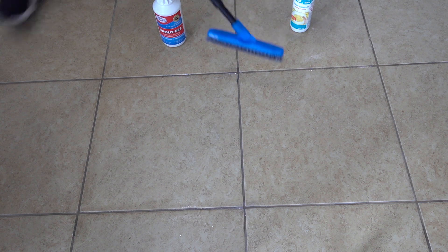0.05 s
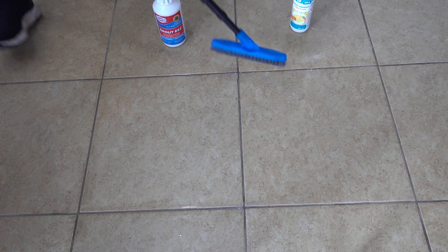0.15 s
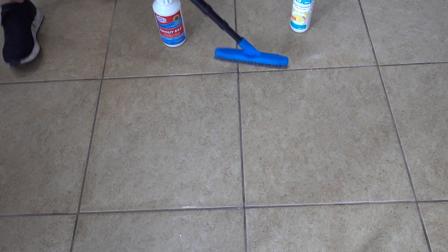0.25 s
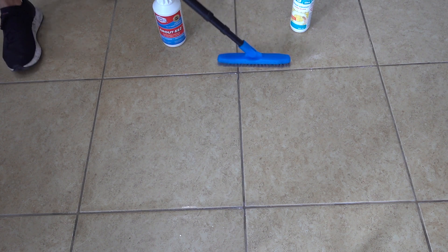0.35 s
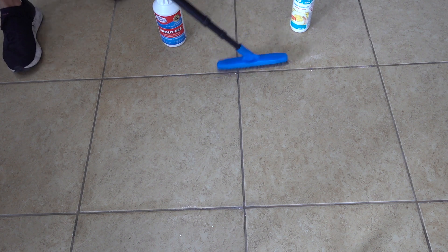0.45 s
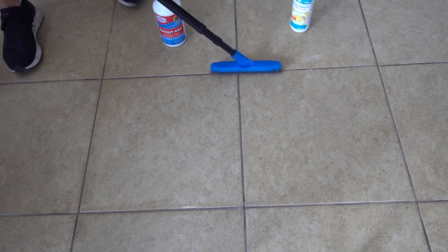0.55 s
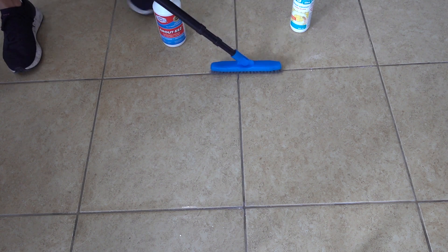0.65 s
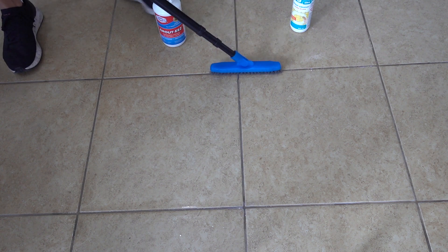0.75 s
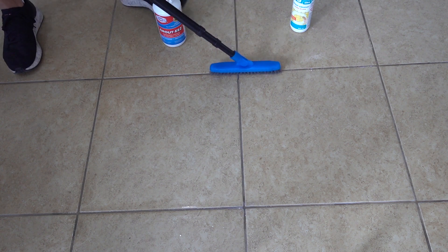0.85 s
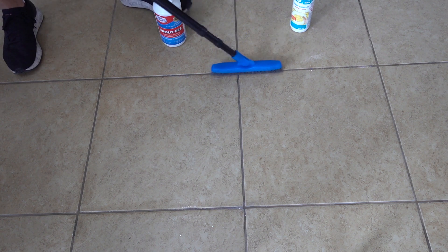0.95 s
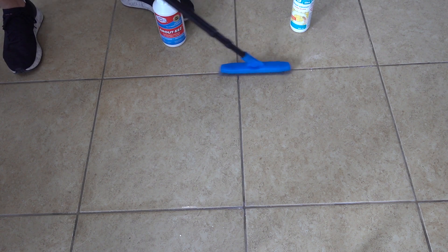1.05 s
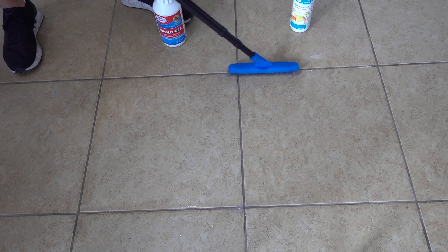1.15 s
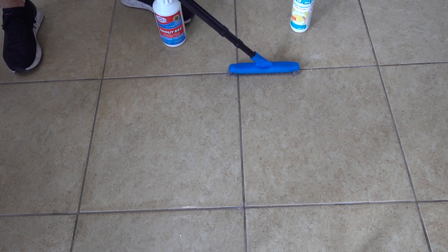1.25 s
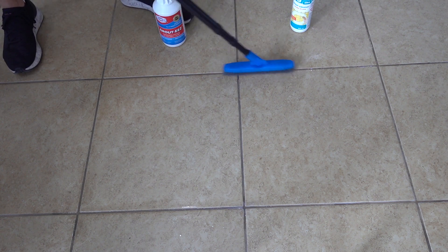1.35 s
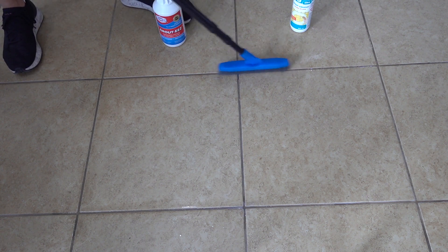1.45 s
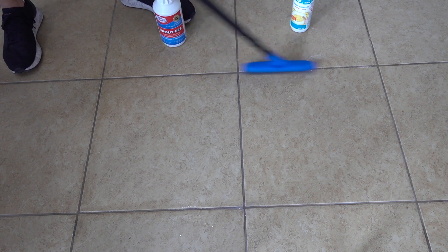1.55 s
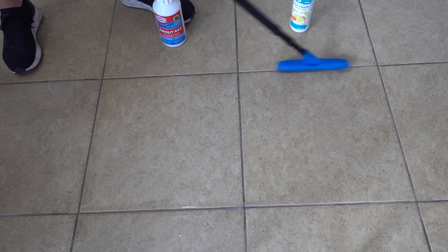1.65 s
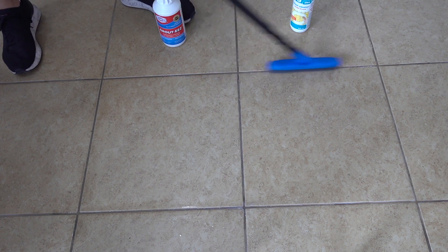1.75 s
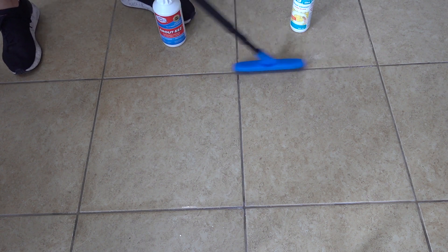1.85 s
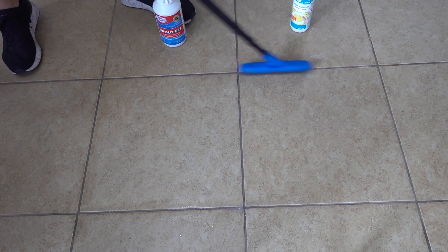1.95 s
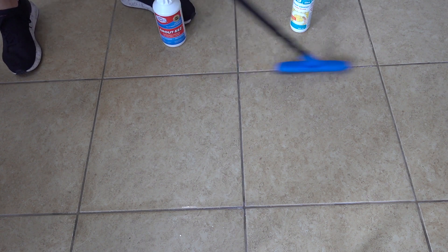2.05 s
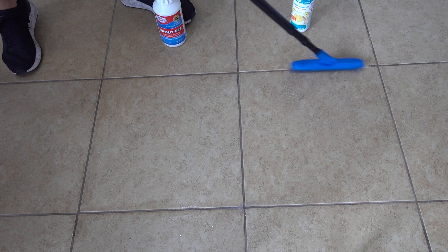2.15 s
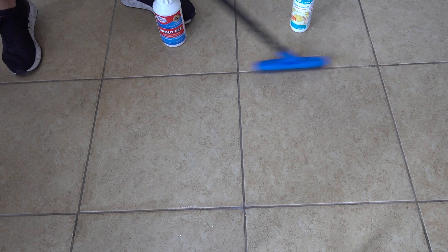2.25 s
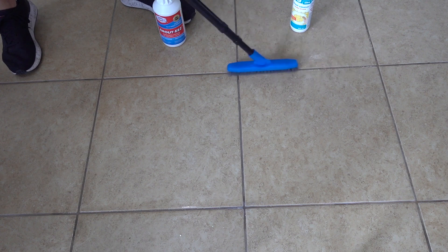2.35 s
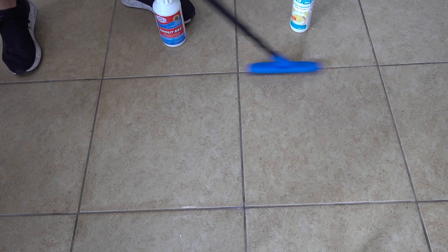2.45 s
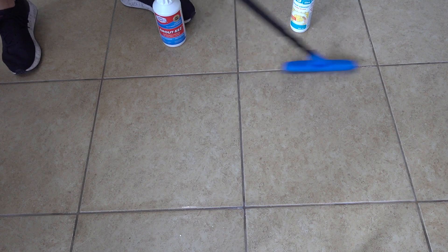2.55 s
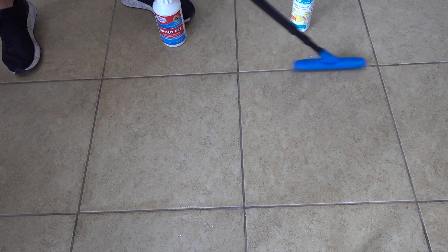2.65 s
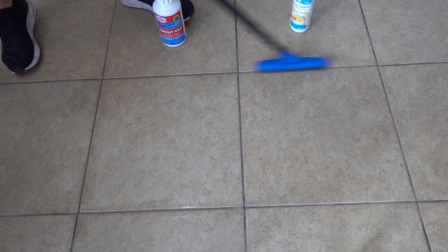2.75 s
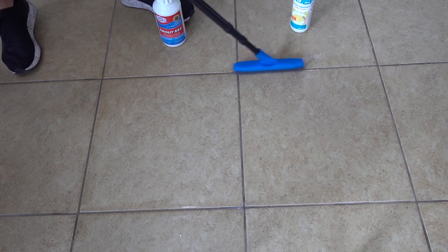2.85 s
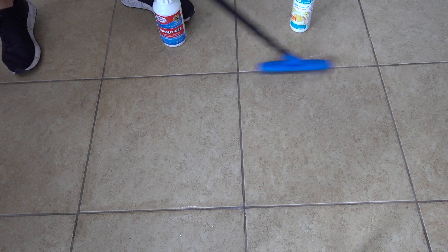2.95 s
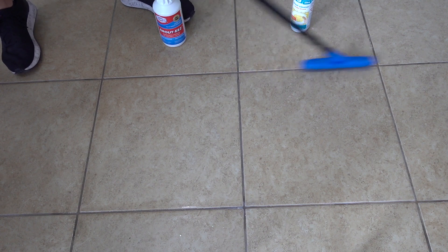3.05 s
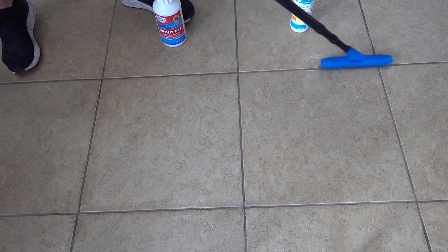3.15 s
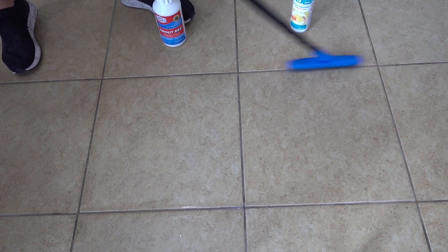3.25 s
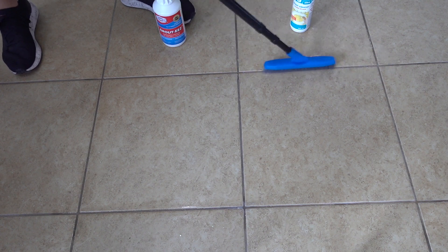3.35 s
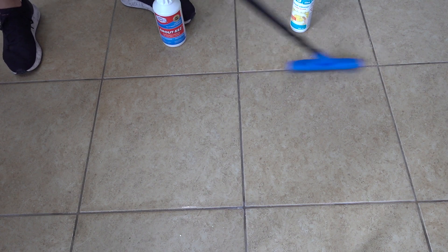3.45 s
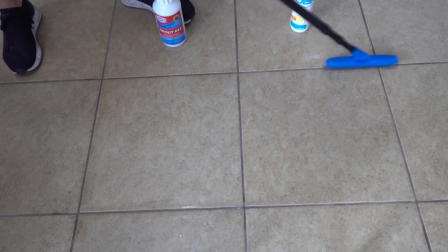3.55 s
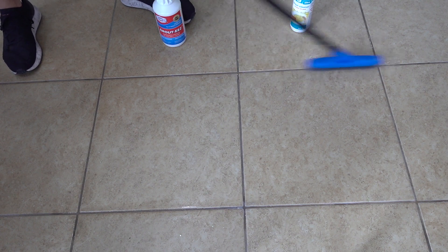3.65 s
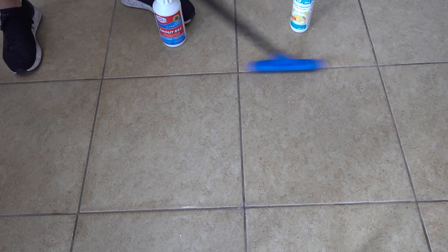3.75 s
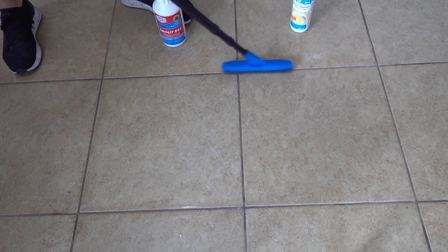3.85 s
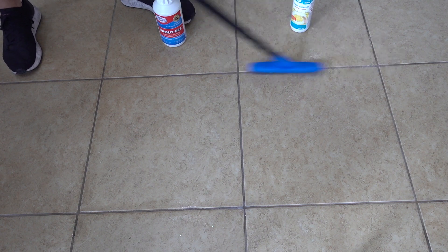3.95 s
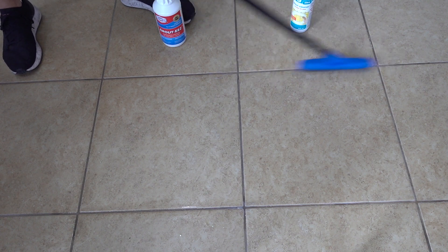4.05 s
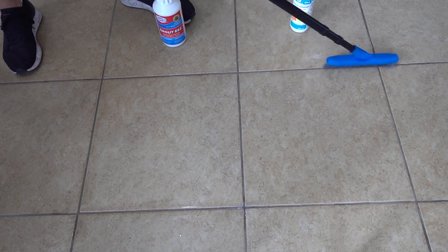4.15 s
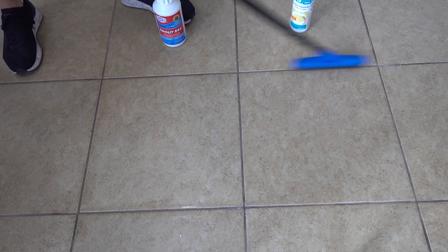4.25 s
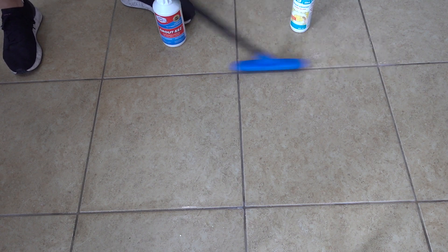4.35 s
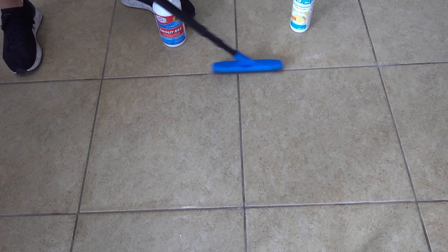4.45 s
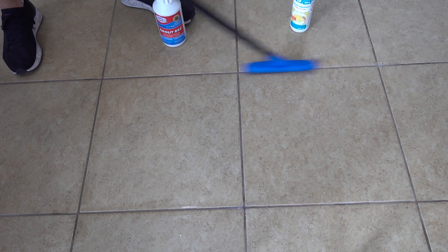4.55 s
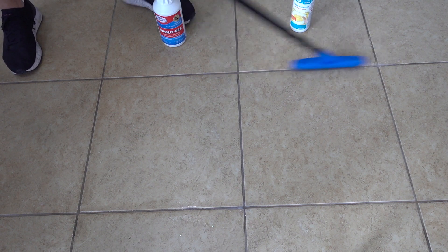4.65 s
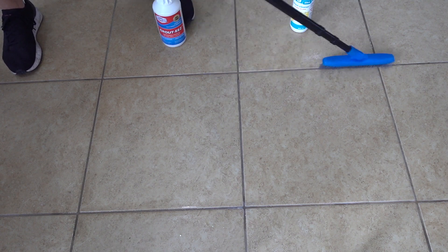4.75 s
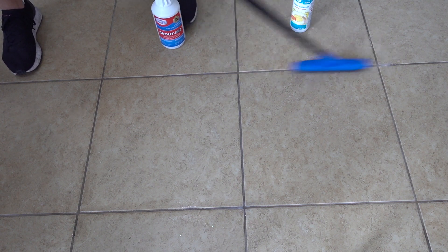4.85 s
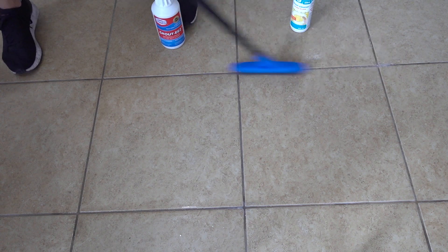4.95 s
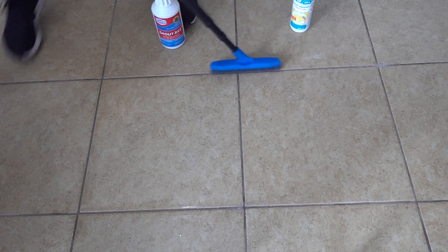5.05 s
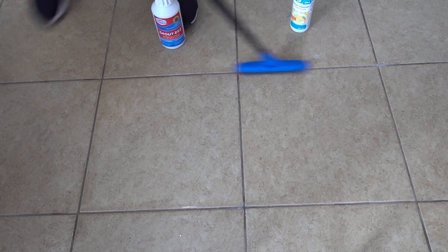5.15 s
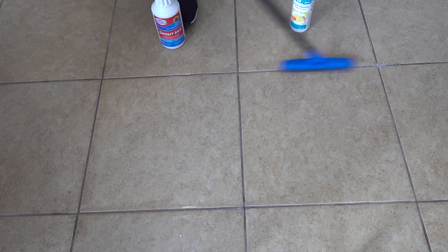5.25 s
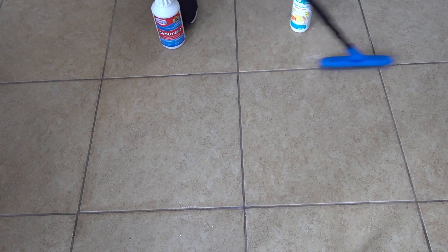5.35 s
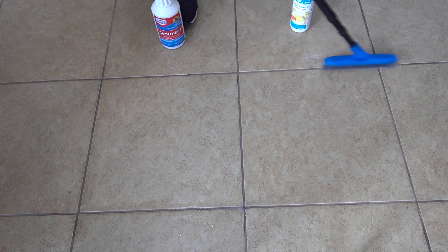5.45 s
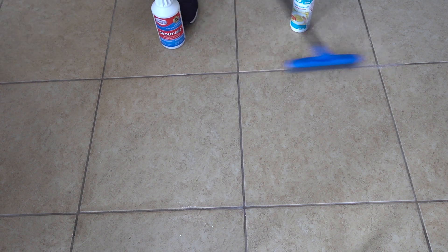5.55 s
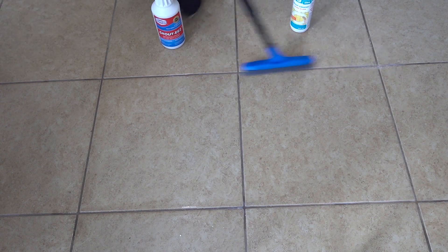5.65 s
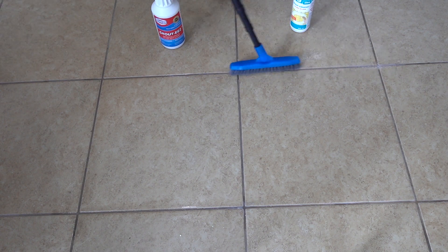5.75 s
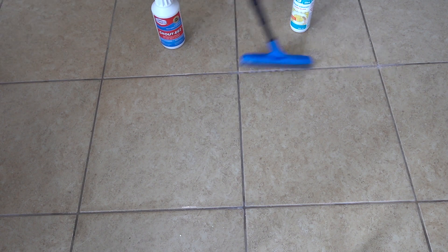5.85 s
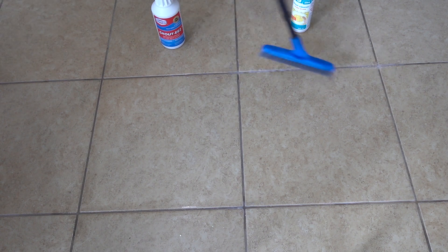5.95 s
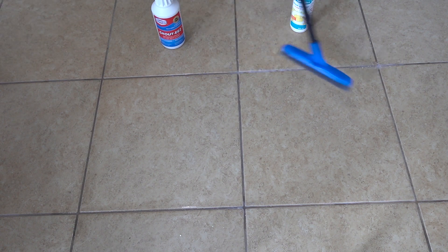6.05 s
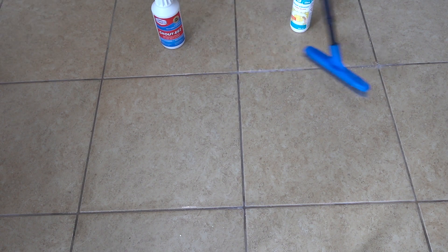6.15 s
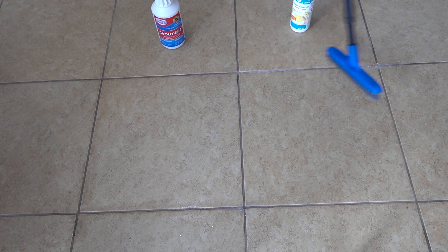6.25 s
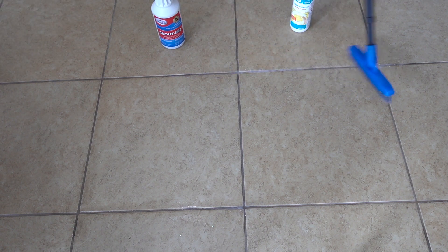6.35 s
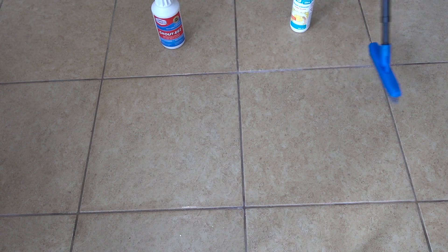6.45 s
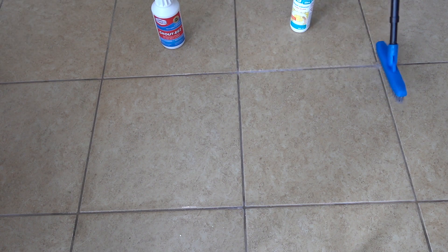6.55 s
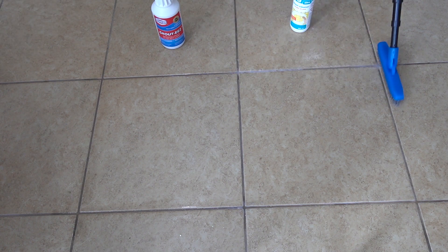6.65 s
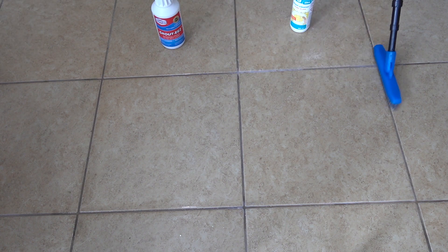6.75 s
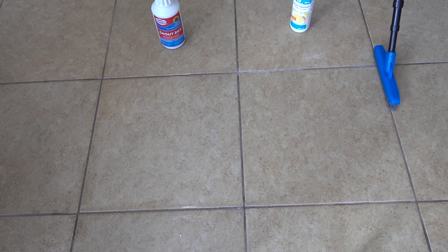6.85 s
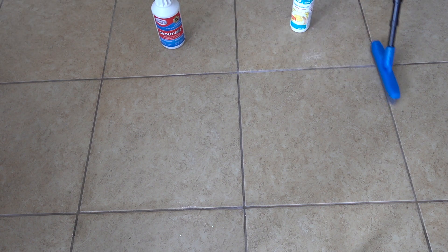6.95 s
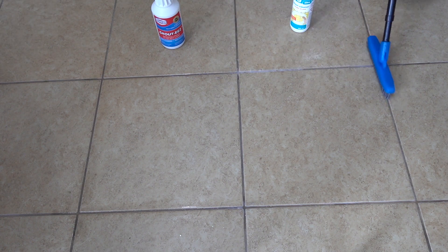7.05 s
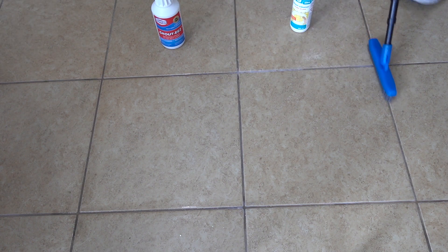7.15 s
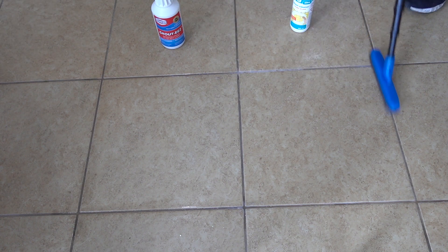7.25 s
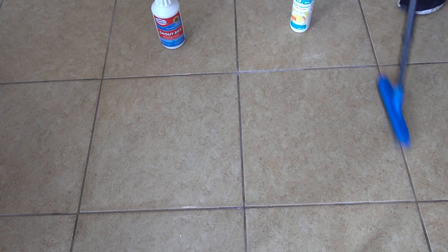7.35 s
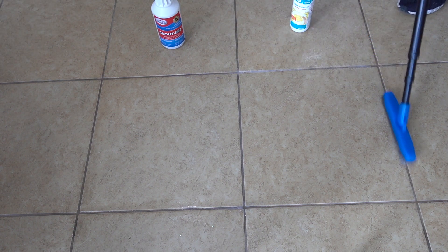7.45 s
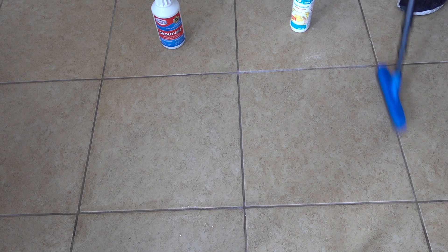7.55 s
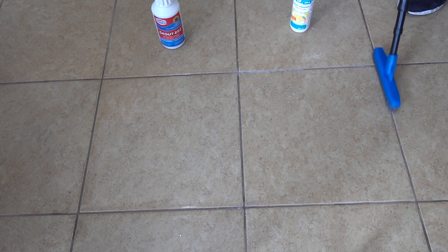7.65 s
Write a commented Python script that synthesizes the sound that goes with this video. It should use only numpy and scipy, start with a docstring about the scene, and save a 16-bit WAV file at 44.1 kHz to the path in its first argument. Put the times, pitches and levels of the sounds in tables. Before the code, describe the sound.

Indoors over quiet room air and a faint low hum, a plastic brush head taps down on tile. Stiff bristles then scrub to and fro about four strokes a second, bright, hissy and gritty. Scrubbing stops, shoes shift softly, the head is turned with small knocks and one sharp clack, then two strong strokes follow. Close microphone, short hard-room echo.

```python
"""Room air and a faint hum come first, then a few plastic knocks, then a stiff brush scrubs tile grout
to and fro at about four strokes a second. In each stroke noise flicks of the bristle tips hiss; a moment
later the bristles bend under the load and rasp lower down, through a sliding resonance. Ringing modes and
noise cracks make the head knock as it is set down and turned; band noise makes the snaps, chatter and
shifting shoes. A decaying noise tail is the hard room's answer."""
import sys
import numpy as np
from scipy import signal
from scipy.fft import rfft, irfft, next_fast_len
from scipy.io import wavfile
from scipy.ndimage import map_coordinates

SR = 44100
rng = np.random.default_rng(int(sys.argv[2]) if len(sys.argv) > 2 else 0)


def transcribe(u):
    """Save the signal u as a 16-bit wav file named by the first command-line argument.

    u: samples, shape (n,) or (channels, n), limited to [-1, 1]; the rate is SR.
    q: integer samples, one column per channel.
    """
    v = np.clip(np.atleast_2d(u).T, -1, 1)
    q = np.round(v * 32767).astype(np.int16)
    wavfile.write(sys.argv[1], SR, q)


N = 340452


def amp(db):
    """Amplitude from dB."""
    return 10 ** (np.asarray(db) / 20)


def unit(x):
    """x at rms 1."""
    return x / np.sqrt(np.mean(x ** 2) + 1e-20)


def along(points, hz):
    """(Hz, value) points read on a log frequency axis."""
    f, v = np.transpose(points)
    return np.interp(np.log(hz + 1), np.log(f + 1), v)


def curves(rows):
    """One value per sample for each column after the time."""
    time_s, *cols = np.transpose(rows)
    return [np.interp(np.arange(N) / SR, time_s, c) for c in cols]


def wobble(rate_hz):
    """A smooth random curve with rate_hz knots a second."""
    knots = rng.standard_normal(int(N * rate_hz / SR) + 4)
    return map_coordinates(knots, [np.arange(N) * rate_hz / SR])


def filtered(x, response):
    """x times a response of frequency."""
    m = next_fast_len(len(x) + 8192)
    hz = np.fft.rfftfreq(m, 1 / SR)
    return irfft(rfft(x, m) * response(hz), m)[:len(x)]


def coloured(x, spectrum):
    """x shaped by a (Hz, dB) spectrum, at rms 1."""
    return unit(filtered(x, lambda hz: amp(along(spectrum, hz))))


def band_noise(size, centre_hz, q):
    """Noise of rms 1 through the same resonance twice."""
    def resonance(f):
        return 1j * f / (centre_hz ** 2 - f * f + 1j * f * centre_hz / q)

    return unit(filtered(rng.standard_normal(size), lambda f: resonance(f) ** 2))


def add(track, start_s, sound):
    """Mix a sound into the track at start_s."""
    part = track[round(start_s * SR):][:len(sound)]
    part += sound[:len(part)]


def scuffs(table, q):
    """Short rubs that swell and fade unevenly, each around its own pitch."""
    out, t = np.zeros(N), np.arange(SR // 2) / SR
    for start_s, db, rise_s, hz in table:
        u = t / rise_s
        envelope = (u * np.exp(1 - u)) ** 2  # peaks at rise_s
        add(out, start_s, amp(db) * envelope * band_noise(len(t), hz, q))
    return out * amp(2.5 * wobble(60))


# room air spectrum: (frequency [Hz], relative level [dB])
AIR_SPECTRUM = [(20, -10), (55, -0.5), (95, -7), (135, -10), (275, -12), (400, -11), (620, -15.5),
                (1270, -22), (4770, -27.5), (9850, -29.5), (10200, -45.5), (15700, -40)]
# hum partials: (frequency [Hz], mean rms level [dB])
HUM_PARTIALS = [(58, -65), (132, -65.5), (229, -71)]


def background():
    """Shaped noise for room air; sines drifting in level and phase for an appliance hum."""
    t = np.arange(N) / SR
    hum = np.zeros(N)
    for hz, db in HUM_PARTIALS:
        level = np.sqrt(2) * amp(db + 1.1 * wobble(2.7))
        hum += level * np.sin(2 * np.pi * hz * t + .4 * wobble(5.2))
    return hum + amp(-52) * coloured(rng.standard_normal(N), AIR_SPECTRUM)


# decay of the hard room: (frequency [Hz], t60 [s])
ROOM_DECAY = [(150, 0.28), (400, 0.35), (1000, 0.59), (2800, 0.64), (8000, 0.59)]


def room(x, wet_db):
    """A sound with the hard room's answer, each frequency dying at its own speed."""
    hz, t, z = signal.stft(rng.standard_normal(SR * 3 // 4), SR, nperseg=256)
    decay = amp(-60 * t / along(ROOM_DECAY, hz)[:, None])
    tail = signal.istft(z * decay, SR, nperseg=256)[1]
    tail = np.pad(tail / np.linalg.norm(tail), (SR // 128, 0))  # delay before the first answer
    return x + amp(wet_db) * signal.fftconvolve(x, tail)[:len(x)]


# shoes on the tiles: (start [s], relative level [dB], rise time [s], centre [Hz])
SHOE_SHIFTS = [(4.965, -39, 0.042, 169), (4.97, -42, 0.06, 255), (4.98, -46, 0.09, 455),
               (5.63, -48, 0.037, 362), (6.19, -52, 0.045, 240), (6.318, -55.5, 0.046, 380),
               (6.37, -44, 0.021, 50)]


def shoes():
    """Shoes shifting on the tiles: low, broad rubs."""
    return scuffs(SHOE_SHIFTS, q=1.07)


# single bristles snapping free: (time [s], relative level [dB], centre [Hz])
BRISTLE_SNAPS = [(.083, -49, 4180), (.602, -43.5, 3800), (1.127, -37, 7200)]


def snaps():
    """A lone bristle springs loose: a thin tick of decaying band noise."""
    out, t = np.zeros(N), np.arange(SR // 16) / SR
    for time_s, db, hz in BRISTLE_SNAPS:
        decay = amp(db - 60 * t / 0.022)
        add(out, time_s, decay * band_noise(len(t), hz, q=1.1))
    return out


# head rubbing on the tile: (start [s], relative level [dB], rise time [s], centre [Hz])
HEAD_CHATTER = [(3.37, -41, 0.022, 1450), (3.6, -43, 0.022, 1370), (3.82, -41.5, 0.028, 1360),
                (4.385, -41.5, 0.021, 1460), (4.99, -41, 0.043, 1310), (6.19, -52.5, 0.032, 1260),
                (6.36, -56.5, 0.052, 1190), (6.89, -43, 0.022, 2200), (6.96, -47.5, 0.018, 2130)]


def chatter():
    """The head chatters and rubs on the tile: short, narrower rubs."""
    return scuffs(HEAD_CHATTER, q=2.4)


# modes of plastic head and handle: (frequency [Hz], mean relative level [dB], t60 [s])
PLASTIC_MODES = [(210, -7, 0.1), (330, -6, 0.067), (447, -8.5, 0.065), (615, 0.5, 0.057),
                 (735, -4.5, 0.043), (826, -3, 0.054), (966, -3.5, 0.036), (1100, 4, 0.027),
                 (1413, -4.5, 0.03), (2160, -2.5, 0.03), (2250, -20, 0.015), (3070, 0, 0.017),
                 (3700, -10, .015)]
# crack spectrum: (frequency [Hz], relative level [dB])
CRACK_SPECTRUM = [(150, -23), (500, 2), (1150, 0), (1650, -6), (2250, 3), (3500, -3.5), (5000, -3.5),
                  (9000, -10)]
# knocks of head and joint; glancing blows have a raised low edge, hard ones a raised high edge:
# (time [s], relative level [dB], low edge [Hz], high edge [Hz])
HEAD_KNOCKS = [(.363, -49, 700, 3500), (.586, -45.5, 800, 2500), (.6685, -33, 600, 1800),
               (.691, -43, 700, 700), (.7243, -27, 200, 1310), (.732, -27.5, 200, 520),
               (.861, -46, 1500, 3000), (6.196, -39, 305, 1216), (6.226, -48, 300, 1200),
               (6.673, -50, 300, 1200), (6.8905, -21.5, 1000, 3270), (6.896, -27, 400, 600),
               (6.938, -36, 400, 1100), (7.421, -39, 150, 1210)]


def knocks():
    """Each contact cracks and rings the plastic; a soft one is dull, a glancing one thin."""
    out, t = np.zeros(N), np.arange(SR // 2) / SR
    for time_s, db, low_hz, high_hz in HEAD_KNOCKS:
        ring = np.zeros(len(t))
        for hz, level_db, t60_s in PLASTIC_MODES:
            decay = amp(level_db + rng.normal(0, 2.5) - 60 * t / t60_s)
            ring += decay * np.sin(2 * np.pi * (hz * t + rng.random()))
        clatter = amp(11.5 - 60 * t / 0.014)  # the crack
        clatter += amp(-8.5 - 60 * t / .09)  # the loose joint buzzing
        onset = 1 - np.exp(-t / 0.00068)
        blow = (ring + clatter * coloured(rng.standard_normal(len(t)), CRACK_SPECTRUM)) * onset
        # each edge is about 2 dB down
        blow = filtered(blow, lambda f: (1j * f / (low_hz / 2 + 1j * f) / (1 + .5j * f / high_hz)) ** 2)
        blow /= blow[:SR // 200].std()  # level set over the first 5 ms
        add(out, time_s, amp(db - 3) * room(blow, wet_db=-6.5))
    return out


def swell(start_s, end_s, attack_s, release_s):
    """Rise, hold and fall of one stroke; the flanks change tenfold per attack or release time."""
    t = np.arange(N // 32 + 1) * 32 / SR  # one value per 32 samples

    def flank(u):
        return .5 + .5 * np.tanh(u * np.log(10) / 2)

    return flank((t - start_s) / attack_s) * flank((end_s - t) / release_s)


def joint_level_db(swells):
    """Summed power of overlapping strokes, in dB per sample."""
    power = np.sum(np.square(swells), axis=0) + 1e-12
    return np.interp(np.arange(N), np.linspace(0, N, len(power)), 10 * np.log10(power))


# bend begins this long after the tips catch, ends this long before they stop
BEND_S, UNBEND_S = .017, 0.02
RASP_RELEASE_RATIO = 1.24  # rasp release / hiss release
# brush strokes, its landing and a light slide as it is turned: (start [s], length [s], attack [s],
# release [s], relative tip hiss level [dB], relative bent-bristle rasp level [dB])
BRUSH_STROKES = [(0.717, 0.02, 0.008, 0.07, -44, -54), (1.218, 0.1, 0.062, 0.11, -31.0, -36),
                 (1.572, 0.051, 0.056, 0.035, -30, -35), (1.691, 0.19, 0.04, 0.054, -25.0, -28),
                 (1.942, 0.13, 0.039, 0.07, -21.0, -26.5), (2.139, 0.19, 0.038, 0.056, -25, -24),
                 (2.377, 0.174, 0.033, 0.047, -21.5, -26.0), (2.6, 0.22, 0.039, 0.049, -26, -24.5),
                 (2.869, 0.17, 0.033, 0.055, -21.5, -26), (3.093, 0.24, 0.044, 0.048, -22, -23.5),
                 (3.385, 0.15, 0.037, 0.064, -19.5, -25.5), (3.607, 0.16, 0.047, 0.059, -20, -23.0),
                 (3.825, 0.2, 0.027, 0.078, -18.5, -25), (4.098, 0.238, 0.045, 0.05, -21.5, -23.5),
                 (4.407, 0.217, 0.068, 0.055, -19.5, -30.5), (4.688, 0.24, 0.052, 0.092, -20, -28.5),
                 (5.012, 0.219, 0.033, 0.061, -19.5, -29.5), (5.319, 0.27, 0.072, 0.077, -21, -26.5),
                 (5.695, 0.173, 0.071, 0.13, -19.0, -28.5), (6.39, 0.05, 0.033, 0.18, -62.5, -61),
                 (7.179, 0.09, 0.105, 0.041, -36, -45.0), (7.454, 0.19, 0.098, 0.057, -23.5, -25.0),
                 (7.694, 0.13, 0.026, 0.074, -21.5, -25)]


def stroke_levels():
    """The tips hiss through the whole stroke; the bristles rasp only while they are bent."""
    tips, rasps = [], []
    for start_s, length_s, attack_s, release_s, tip_db, rasp_db in BRUSH_STROKES:
        end_s = start_s + length_s
        tip = swell(start_s, end_s, attack_s, release_s)
        rasp = swell(start_s + BEND_S, end_s - UNBEND_S, attack_s, release_s * RASP_RELEASE_RATIO)
        tips.append(amp(tip_db) * tip)
        rasps.append(amp(rasp_db) * rasp)
    return joint_level_db(tips), joint_level_db(rasps)


def flicks(rate_hz, scatter_db):
    """Bristles letting go at random moments, each with its own force."""
    hits = rng.random(N) < rate_hz / SR
    sign = np.sign(rng.standard_normal(N))
    return hits * sign * amp(scatter_db * rng.standard_normal(N))


# bent-bristle resonance at rest pitch: (frequency [Hz], relative level [dB])
RASP_SPECTRUM = [(900, -39), (1900, -16.5), (2350, -8.5), (2750, -2), (3200, -0.5), (3800, -4),
                 (4800, -8.5), (6300, -17), (9000, -32)]


def bent(x, pitch_hz, rest_hz):
    """The bristles' resonance, sliding with their bend."""
    hz, t, z = signal.stft(x, SR, nperseg=256)
    shift = np.interp(t, np.arange(N) / SR, pitch_hz) / rest_hz
    resonance = amp(along(RASP_SPECTRUM, hz[:, None] / shift))
    return unit(signal.istft(z * resonance, SR, nperseg=256)[1][:N])


# rasp pitch when as loud as the hiss; it sinks as the rasp takes over
RASP_HZ, SAG_HZ_PER_DB = 3194, 42
# spectra of tips, grit and head-borne scrub: (frequency [Hz], relative level [dB])
TIP_SPECTRUM = [(2000, -47), (4000, -22), (5600, -6.5), (6900, -5.5), (7700, -0.5), (8500, 1), (9300, -2),
                (9900, -7)]
GRIT_SPECTRUM = [(1200, -38), (2600, -10), (3800, -4), (4600, -0.5), (6000, -1), (7200, -1.5), (9900, -3)]
HEAD_SPECTRUM = [(100, -19), (200, -13.5), (400, -4), (600, -8.5), (900, -2.5), (1300, -1), (1900, -4),
                 (3000, -9)]
# grittiness of the grout: (time [s], grit level relative to drag, before a fixed gain [dB])
GROUT_GRIT = [(1.7, -11.5), (2.6, -5.5), (3.3, -7), (4.4, -2.5), (5.7, -3.5), (6.1, 3.5), (7.4, -11)]


def brush():
    """Bristles flick in tufts over the gritty grout; the head passes on a duller scrub."""
    tip_db, rasp_db = stroke_levels()
    grit_db, = curves(GROUT_GRIT)
    load_db = np.clip(rasp_db - tip_db, -12, 4)
    pitch_hz = RASP_HZ - SAG_HZ_PER_DB * load_db
    drag_db = .5 * (tip_db + rasp_db)
    tufts = amp(0.43 * wobble(170) + 0.38 * wobble(40))  # neighbours catch and let go together
    tips = amp(tip_db + 0.62) * coloured(flicks(10000, scatter_db=3.0), TIP_SPECTRUM)
    rasp = amp(rasp_db + 0.12) * bent(flicks(7000, scatter_db=1.5), pitch_hz, rest_hz=3260)
    grit = amp(drag_db + grit_db + 7.5) * coloured(flicks(9000, scatter_db=2.0), GRIT_SPECTRUM)
    head = amp(0.56 * drag_db - 25.5) * coloured(flicks(2500, scatter_db=1.5), HEAD_SPECTRUM)
    return tufts * (tips + rasp + grit + head)


# low-pass cutoff of everything but the background; band limit of the whole
NEAR_CUTOFF_HZ, TOP_HZ = 9970, 15800


def scene():
    """Brush, shoes and knocks in the room, low-passed, over the steady air."""
    scrub = room(brush() + chatter(), wet_db=-11.5)
    small = room(snaps() + shoes(), wet_db=-6)
    near = scrub + small + knocks()
    near = filtered(near, lambda hz: 1 / np.sqrt(1 + (hz / NEAR_CUTOFF_HZ) ** 400))
    return (near + background())[None]


def record(dry):
    """Sharp band limit: only frequencies below TOP_HZ pass."""
    return filtered(dry[0], lambda hz: hz < TOP_HZ)[None]


dry = scene()
out = record(dry)
transcribe(out)
```